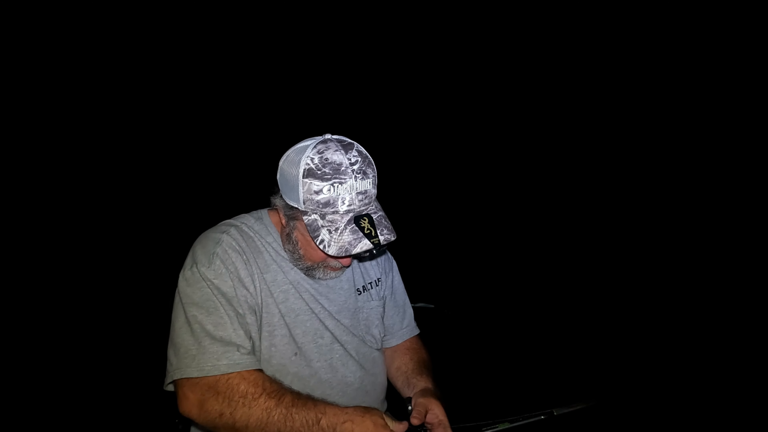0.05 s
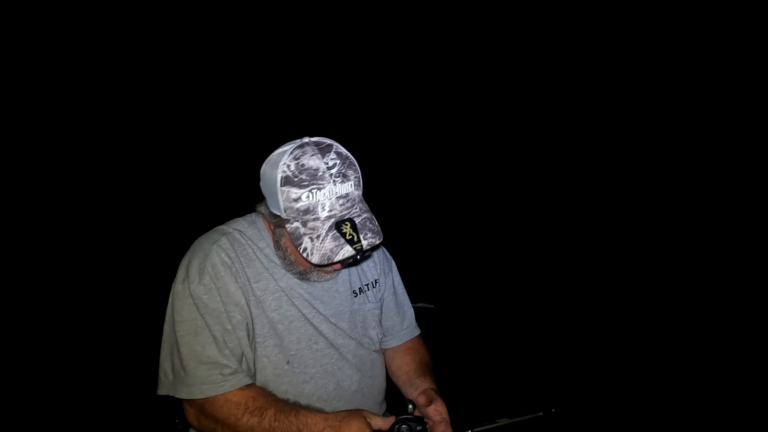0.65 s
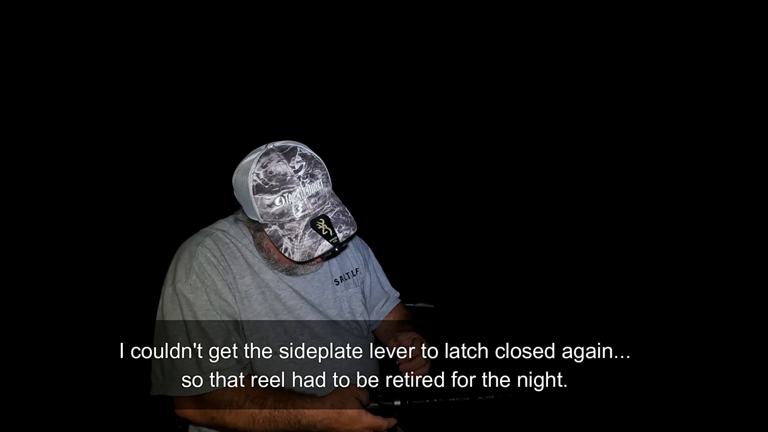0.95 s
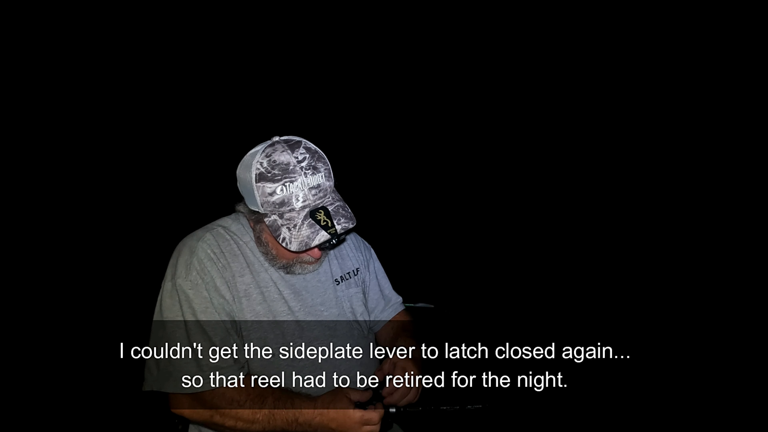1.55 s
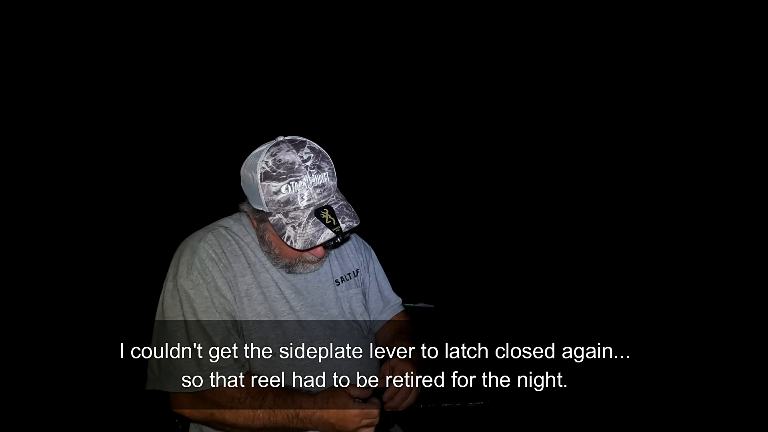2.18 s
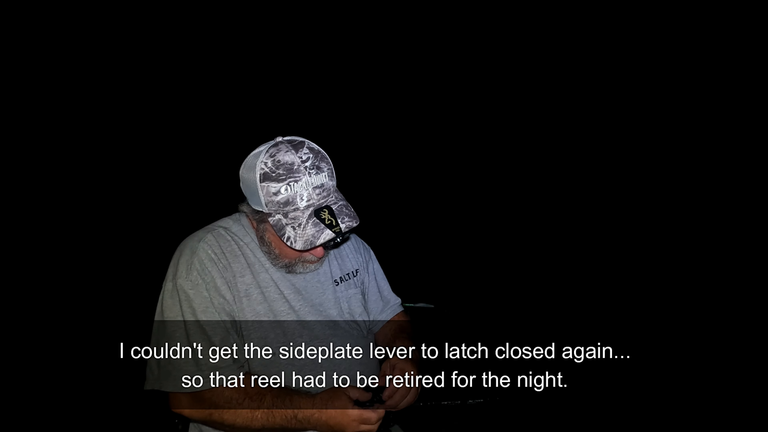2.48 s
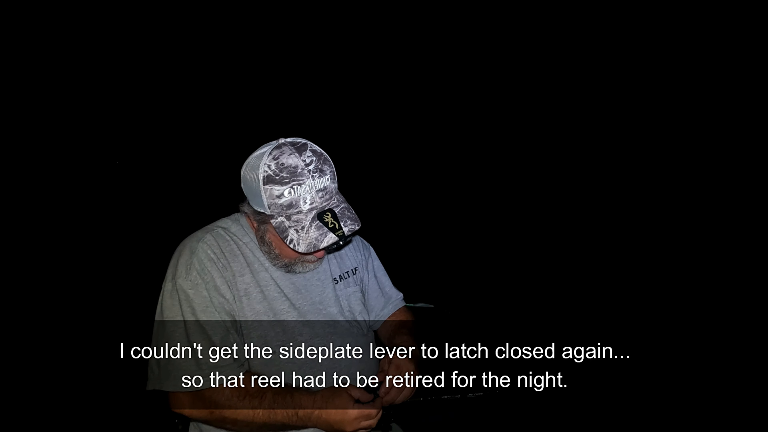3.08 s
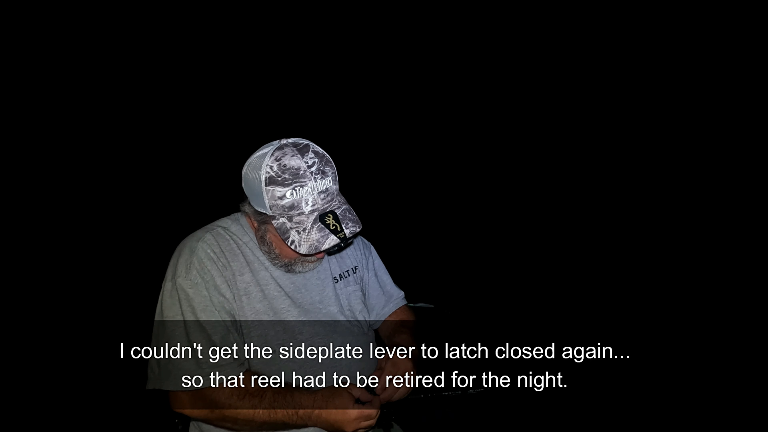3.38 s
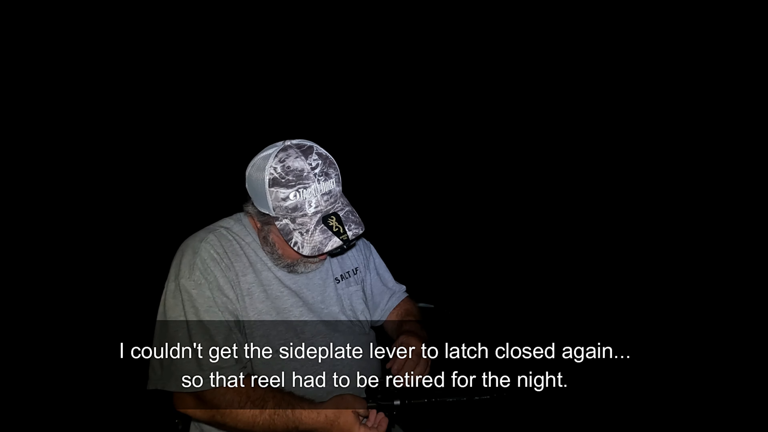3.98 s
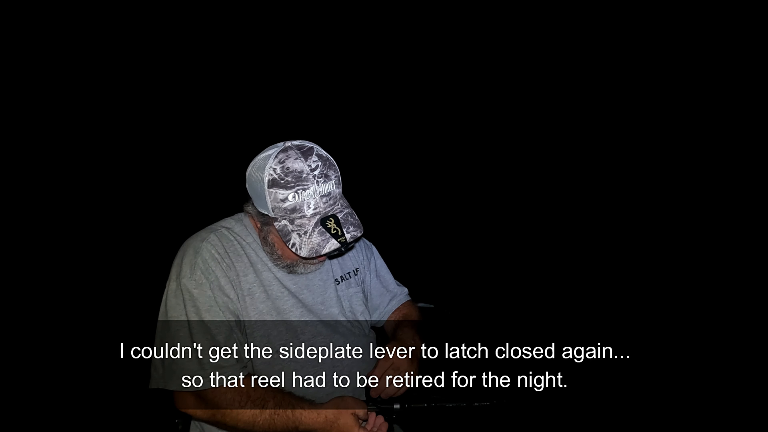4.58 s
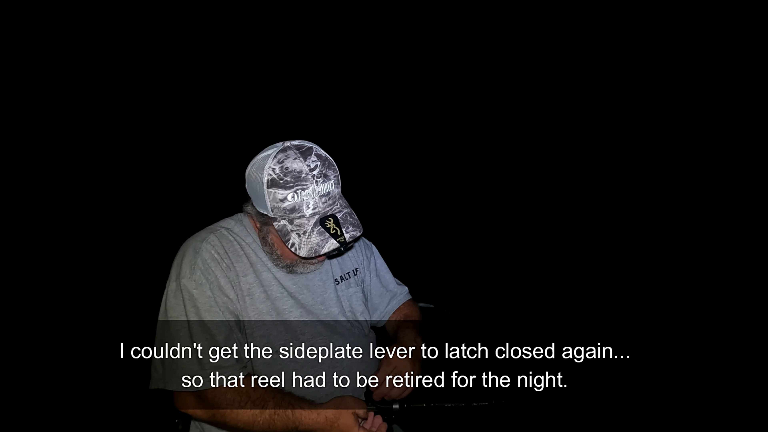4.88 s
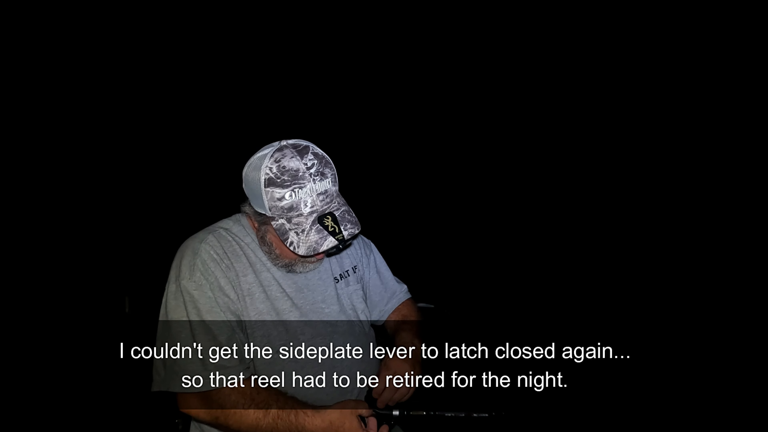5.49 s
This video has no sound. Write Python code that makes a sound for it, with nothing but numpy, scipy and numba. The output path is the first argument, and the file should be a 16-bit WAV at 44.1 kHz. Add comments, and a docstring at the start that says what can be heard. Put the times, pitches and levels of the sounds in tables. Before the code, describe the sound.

Crickets and buzzing insects sing steadily outdoors while a fishing reel's lever snaps loudly twice among light handling knocks.

```python
"""A night chorus of insects by a lake: a shrill wall of rasping wings, and crickets trilling at three
pitches, each wing stroke a short tone. Close by, a fishing reel is handled: soft knocks and rubs, and
two hard snaps of its lever that ring its modes. Bubbles plip in the water over a low, far rumble.
The snaps overload the camera, whose gain control ducks the chorus and lets it swell back."""
import sys
import numpy as np
from scipy import signal
from scipy.fft import rfft, irfft, next_fast_len
from scipy.io import wavfile
from scipy.ndimage import map_coordinates
from numba import njit

SR = 44100
rng = np.random.default_rng(int(sys.argv[2]) if len(sys.argv) > 2 else 0)


def generate_wav(sig):
    """Save sig (samples, or channels by samples) to the path in sys.argv[1] as 16-bit PCM at SR."""
    pcm = np.round(np.clip(np.atleast_2d(sig).T, -1, 1) * 32767).astype(np.int16)
    wavfile.write(sys.argv[1], SR, pcm)


N = 248724

# spectral shapes of the insects' rasp and of its overtone: frequency_hz, density_db
RASP_SPECTRUM = [(2000, -65), (3400, -33.5), (3920, -35), (4120, -34), (5020, -4.5), (5450, 1.5),
                 (5690, -1.5), (5970, -5), (6220, -19), (6450, -27.5), (7800, -45.5), (10100, -85),
                 (17200, -120)]
OVERTONE_SPECTRUM = [(4710, -39), (8000, -38), (8240, -58), (8650, -15), (10900, 4), (11300, 3),
                     (12400, -6.5), (13500, -8), (14200, -24), (16100, -30), (22000, -120)]
# crowds of crickets: pitch_hz, pitch_spread_ratio, strokes_per_s, rate_spread_ratio, level_db, lean_db
CRICKET_CROWDS = [(2413, 0.014, 67, .1, -31, 3), (2660, 0.02, 61, .1, -31, 1.5),
                  (3052.5, 0.017, 42, .15, -34, -3.5)]
# the nearest crickets: pitch_hz, strokes_per_s, level_db, lean_db
CRICKET_SOLOS = [(3030, 38.9, -38.5, -4), (2425, 67.3, -38.5, 3)]
# how keenly the crickets sing: time_s, gain_db
CRICKET_KEENNESS = [(0, .3), (.55, -1.5), (.82, 0.5), (1.5, 0.7), (1.88, -1.6), (2.1, -0.1), (3.6, -.2),
                    (4.3, 0.1), (5.4, -0.9)]
# nearer shrill insects: pitch_hz, width_hz, strokes_per_s, level_db, lean_db
NEAR_BUZZERS = [(5500, 220, 25, -36, 1), (5400, 400, 104, -37, -1)]
# snaps of the lever: start_s, level_db, slam_band_hz, seat_band_hz, seat_delay_s, jolt_db, jolt_band_hz
LEVER_SNAPS = [(2.1534, 14.5, 13000, 5800, 0.0022, 4.5, 520), (3.4314, 15, 8360, 6850, .0014, -6, 1050)]
# modes of the lever and of the whole reel jolted in the hand: frequency_hz, level_db, t60_s
LEVER_MODES = [(2410, 11.5, 0.0048), (3910, 0, 0.0093), (4580, 0.5, 0.0062), (5870, 2.5, 0.0037),
               (6685, -2.5, 0.0074), (7207, -1, 0.0049), (7940, -2.5, 0.0038), (9925, 2, 0.0046),
               (11350, 0, 0.0054), (11990, 0, 0.0069)]
JOLT_MODES = [(400, 1, 0.0044), (800, -4, .005), (1160, 0, 0.0044), (1560, 3, .007)]
# modes of the reel's body: frequency_hz, level_db
BODY_MODES = [(440, -10), (665, -5.5), (1000, -2), (1270, -11), (1530, -8), (1740, -8), (1980, -6)]
# hands knocking the reel, each level relative within its column:
# start_s, ring_db, band_hz, t60_s, clatter_db, click_db, tick_db
HAND_KNOCKS = [(0.476, -37, 1850, .03, -31, -54, -56), (0.6765, -20, 580, .04, -24, -56, -70),
               (0.731, -35, 915, .025, -29, -54, -54), (0.7645, -37, 1900, .02, -36, -44, -43),
               (2.084, -48, 1200, .02, -46, -48, -48), (2.11, -42, 700, .03, -39, -52, -45),
               (3.901, -29, 1650, .035, -29, -34, -45), (4.728, -28, 600, .05, -25, -37, -40),
               (4.7795, -24, 700, .045, -19, -42, -47), (4.8925, -35, 900, .03, -35, -35, -38),
               (4.9225, -29, 640, .05, -25, -39, -24), (4.935, -30, 900, .04, -36, -38, -50),
               (4.9525, -26, 1500, .05, -22, -38, -43), (4.959, -29, 600, .04, -36, -50, -60),
               (5.361, -31, 1900, .06, -32, -48, -55), (5.5575, -20.5, 1700, .03, -19, -26, -39),
               (5.5655, -28, 1000, .04, -33, -44, -56)]
# fingers rubbing the reel: middle_s, length_s, level_db, centre_hz
FINGER_RUBS = [(0.75, .09, -50, 1250), (4.79, .04, -48, 1000), (4.914, .03, -45, 6000),
               (4.953, .07, -45.5, 1050), (4.988, .03, -37.5, 1450), (5.37, .06, -47, 1600)]
# bubbles in the water: start_s, relative_level_db, pitch_hz
BUBBLES = [(0.9675, -29, 1265), (1.33, -32, 1245), (1.752, -29.5, 1000), (3.8177, -38, 1100)]
# spectral shape of the far rumble: frequency_hz, density_db
RUMBLE_SPECTRUM = [(15, -32), (25, 3.5), (108, -7), (140, -2.5), (175, 0), (234, -6.5), (429, -19),
                   (479, -19), (771, -25), (1030, -22), (1660, -26), (2000, -28), (2600, -44), (4400, -120)]
# soft bumps in the deepest rumble: middle_s, level_db
RUMBLE_BUMPS = [(0.08, -38), (0.45, -36), (2.92, -39), (4.76, -34), (5.41, -42)]
# swells of the far murmur: middle_s, length_s, rise_db
MURMUR_SWELLS = [(0.25, .12, 3), (1.28, .3, 3), (1.7, .1, 3), (2.0, .12, 3), (3.28, .3, 4), (3.8, .1, 4),
                 (4.25, .22, 4), (5.17, .12, 5)]
# likeness of left and right in rasp and rumble: frequency_hz, coherence_ratio
STEREO_COHERENCE = [(60, 0.8), (250, 0.66), (700, 0.25), (2000, 0.4), (5500, 0.69), (12000, 1)]
# their level on the left over that on the right: frequency_hz, lean_db
STEREO_LEAN = [(60, -2), (110, -2.5), (190, -4.5), (350, -5.5), (630, -6), (1140, -3), (2040, -1),
               (3680, 2), (6630, -0.5), (11900, 1.5)]


def shrill_insects(count=8, strokes_per_s=150, rate_spread=.35, depth=0.18, overtone_db=-28):
    """Incoherent summation: many rasps, each noise pulsed by wing strokes, fuse into a shimmering wall."""
    t, rasps = np.arange(N) / SR, np.zeros((2, N))
    for _ in range(count):
        cycles = strokes_per_s * np.exp(rate_spread * rng.normal()) * t + .5 * wobble(4.4)
        rasps += (1 + depth * np.cos(2 * np.pi * cycles)) * rng.standard_normal((2, N))
    wall = diffuse(rasps, RASP_SPECTRUM) + amp(overtone_db) * diffuse(rasps, OVERTONE_SPECTRUM)
    shimmer_db = 0.35 * wobble(11)
    return wall * amp(-23.5 + shimmer_db)


def trill(pitch_hz, strokes_per_s, stroke_s, sag, wet_db, jitter_s=.0005, uneven_db=2.0, t60_s=0.47):
    """Stridulation: each wing stroke of a cricket is a short tone whose pitch sags as the wing slows."""
    progress = np.linspace(0, 1, int(stroke_s * SR))
    glide_hz = pitch_hz * (1 - sag * (progress - .5))
    stroke = np.sin(np.pi * progress) * np.sin(2 * np.pi * np.cumsum(glide_hz) / SR)
    timing, force = rng.standard_normal((600, 2)).T
    starts_s = (np.arange(len(timing)) + rng.random()) / strokes_per_s + jitter_s * timing
    pulses = np.bincount(np.abs(starts_s * SR).astype(int), amp(uneven_db * force), N)[:N]
    # the trees scatter the call along different paths to each microphone port
    t = np.arange(SR // 5) / SR
    echoes = unit(rng.standard_normal((2, len(t))) * amp(-60 * t / t60_s))
    paths = amp(wet_db) * echoes / np.sqrt(len(t))
    paths[:, 0] += 1  # the direct path
    scattered = signal.fftconvolve(stroke[None], paths, axes=1)
    return unit(signal.oaconvolve(pulses[None], scattered, axes=1)[:, :N])


def crickets(count=9, solo_duty=0.72):
    """Superposition: trills a little apart in pitch and pace blur into crowds; two crickets sing nearer."""
    out = np.zeros((2, N))
    for hz, hz_spread, rate, rate_spread, db, lean_db in CRICKET_CROWDS:
        crowd = np.zeros((2, N))
        for detune in np.linspace(-hz_spread, hz_spread, count):
            own_rate = rate * np.exp(rate_spread * rng.normal())
            crowd += trill(hz * (1 + detune), own_rate, stroke_s=0.00943, sag=0.099, wet_db=-1.0)
        out += panned(unit(crowd), lean_db) * amp(db + 0.46 * wobble(5.9))
    for hz, rate, db, lean_db in CRICKET_SOLOS:
        solo = trill(hz, rate, stroke_s=solo_duty / rate, sag=.035, wet_db=-8, jitter_s=.0003)
        out += panned(solo, lean_db) * amp(db + 0.18 * wobble(4.6))
    keenness_db = np.interp(np.arange(N) / SR, *np.transpose(CRICKET_KEENNESS))
    return lagged(out * amp(keenness_db), lag_ms=0.035)


def buzzers():
    """Forced resonance: each stroke's scrape drives a narrow resonance of the wing."""
    t, out = np.arange(N) / SR, np.zeros((2, N))
    for hz, width_hz, rate, db, lean_db in NEAR_BUZZERS:
        strokes = np.sin(np.pi * (rate * t + .2 * wobble(3))) ** 2
        wing = resonate(strokes * rng.standard_normal(N), hz, width_hz)
        out += panned(amp(db) * unit(wing), lean_db)
    return out


def whistler(pitch_hz=5567, drift_hz=5, level_db=-39.5, flutter_db=2):
    """Random modulation: one insect's thin note drifts in pitch and flutters in level on each side."""
    phase = 2 * np.pi * np.cumsum(pitch_hz + drift_hz * wobble(12)) / SR
    flutter = amp(flutter_db * np.array([wobble(18), wobble(7.9)]))
    return amp(level_db) * unit(np.sin(phase) * flutter)


def lever_snaps(slam_s=.00055, rebound_s=.0034, light_band_hz=6270, crack_db=-15, crack_t60_s=.013):
    """Impact excitation: each contact of the lever cracks and rings it; the slam also jolts the reel."""
    ring, crack = np.zeros((2, N))
    t = np.arange(SR // 20) / SR
    for start_s, snap_db, slam_hz, seat_hz, seat_s, jolt_db, jolt_hz in LEVER_SNAPS:
        contacts = [(0, -15.5, light_band_hz),  # the catch trips
                    (slam_s, 0, slam_hz),  # the lever slams home,
                    (seat_s, -4, seat_hz),  # seats
                    (rebound_s, -5.5, light_band_hz)]  # and rebounds once
        for delay_s, contact_db, band_hz in contacts:
            at_s, db = start_s + delay_s, snap_db + contact_db
            add(ring, at_s, amp(db) * struck(LEVER_MODES, t, band_hz, octaves=0.4))
            add(crack, at_s, burst(t, db + crack_db, crack_t60_s))
        add(ring, start_s + slam_s, amp(jolt_db) * struck(JOLT_MODES, t, jolt_hz, octaves=1.1))
    sound = ring + resonate(crack, centre_hz=7500, width_hz=4300)
    return lagged(panned(sound, lean_db=1.2), lag_ms=0.005)


def reel_knocks(detune=0.029, click_t60_s=0.013):
    """Damped vibration: a touch clicks small parts and rings body modes that the grip shifts and damps."""
    ring, clatter, click, tick = np.zeros((4, N))
    t = np.arange(SR // 5) / SR
    for start_s, ring_db, band_hz, t60_s, clatter_db, click_db, tick_db in HAND_KNOCKS:
        modes = [(hz * (1 + detune * rng.normal()), db, t60_s) for hz, db in BODY_MODES]
        add(ring, start_s, amp(ring_db) * struck(modes, t, band_hz, octaves=0.44))
        add(clatter, start_s, burst(t, clatter_db + 2, t60_s))
        add(click, start_s, burst(t, click_db + 22, click_t60_s))
        add(tick, start_s, burst(t, tick_db + 20, click_t60_s))
    sound = ring + resonate(clatter, centre_hz=1670, width_hz=2100)
    sound += resonate(click, centre_hz=4500, width_hz=1750)
    sound += resonate(tick, centre_hz=6330, width_hz=850)
    return panned(sound, lean_db=-1.5)


def finger_rubs(slips_per_s=1500, width_ratio=0.75):
    """Stick-slip friction: fingers slide over the reel in a run of tiny slips that swells and fades."""
    out = np.zeros(N)
    for middle_s, length_s, db, hz in FINGER_RUBS:
        slips = rng.standard_normal(N) * (rng.random(N) < slips_per_s / SR)
        out += amp(db) * hump(middle_s, length_s) * unit(resonate(slips, hz, width_ratio * hz))
    return panned(out, lean_db=-6)


def water_plips(length_s=0.042, rise_per_s=1.2, rough_rad=0.35, gain_db=-8.0):
    """Bubble resonance: each bubble rings with a soft start and a slightly rising pitch."""
    out, t = np.zeros(N), np.arange(int(length_s * SR)) / SR
    envelope = np.sin(np.pi * (t / length_s) ** .6) ** 2
    for start_s, db, hz in BUBBLES:
        phase = 2 * np.pi * hz * t * (1 + rise_per_s * t / 2) + rough_rad * wobble(370)[:len(t)]
        add(out, start_s, amp(db + gain_db) * envelope * np.sin(phase))
    return panned(out, lean_db=4.5)


def far_rumble(deep_hz=85, swell_top_hz=296, bump_length_s=0.142):
    """Amplitude modulation of a far murmur: its middle band swells, its deepest heaves and bumps."""
    murmur = diffuse(rng.standard_normal((2, N)), RUMBLE_SPECTRUM)
    deep = filtered(murmur, lambda hz: 1 / (1 + (hz / deep_hz) ** 4))
    upper = filtered(murmur, lambda hz: 1 - 1 / (1 + (hz / swell_top_hz) ** 4))
    middle = murmur - deep - upper
    heave = amp(-42.5 + 1.5 * wobble(8.8))
    bumps = sum(amp(db) * hump(middle_s, bump_length_s) for middle_s, db in RUMBLE_BUMPS)
    swell = amp(sum(db * hump(middle_s, length_s) for middle_s, length_s, db in MURMUR_SWELLS))
    waver = amp(-36 + 1.32 * wobble(6.3))
    return (middle * swell + upper) * waver + unit(deep) * (heave + bumps)


def struck(modes, t, band_hz, octaves):
    """Modal synthesis: a contact rings mostly the modes near its own band."""
    reach = lambda hz: 1 / (1 + (np.log2(hz / band_hz) / octaves) ** 2)
    return sum((-1) ** k * reach(hz) * amp(db - 60 * t / t60_s) * np.sin(2 * np.pi * hz * t)
               for k, (hz, db, t60_s) in enumerate(modes))


def burst(t, level_db, t60_s):
    """Exponential decay of white noise."""
    return amp(level_db - 60 * t / t60_s) * rng.standard_normal(len(t))


def resonate(x, centre_hz, width_hz):
    """Second-order resonance, applied twice for steep skirts."""
    return filtered(x, lambda f: (1j * f * width_hz / (centre_hz ** 2 - f * f + 1j * f * width_hz)) ** 2)


def diffuse(pair, spectrum):
    """Partial coherence: two unrelated signals mix into one coloured, wide stereo sound of rms 1."""
    def mid_side_gains(hz):
        angle = np.arccos(np.clip(along(STEREO_COHERENCE, hz), -1, 1)) / 2
        return amp(along(spectrum, hz)) * [np.cos(angle), np.sin(angle)]
    mid, side = filtered(pair, mid_side_gains)
    stereo = np.array([mid + side, mid - side])
    return unit(filtered(stereo, lambda hz: panned(1, along(STEREO_LEAN, hz))))


def panned(x, lean_db):
    """Level difference: left is louder than right by lean_db."""
    return x * amp(np.array([[.5], [-.5]]) * lean_db)


def lagged(pair, lag_ms):
    """Arrival-time difference: sound reaches the left port lag_ms after the right."""
    return filtered(pair, lambda hz: np.exp(np.array([[-1j], [1j]]) * np.pi * hz * lag_ms / 1000))


def filtered(x, response):
    """Linear filtering: the spectrum of x times a complex frequency response."""
    size = next_fast_len(N + SR // 2)
    return irfft(rfft(x, size) * response(np.fft.rfftfreq(size, 1 / SR)), size)[..., :N]


def hump(middle_s, length_s):
    """Gaussian envelope, length_s wide at 1/e of its peak."""
    return np.exp(-(2 * (np.arange(N) / SR - middle_s) / length_s) ** 2)


def wobble(knots_per_s):
    """Smooth random fluctuation."""
    knots = rng.standard_normal(int(N * knots_per_s / SR) + 4)
    return map_coordinates(knots, [np.arange(N) * knots_per_s / SR])


def along(points, hz):
    """Interpolation on a logarithmic frequency axis."""
    points_hz, values = np.transpose(points)
    return np.interp(np.log(hz + 1), np.log(points_hz + 1), values)


def add(track, start_s, sound):
    """Superposition of a sound on a track."""
    part = track[round(start_s * SR):][:len(sound)]
    part += sound[:len(part)]


def amp(db):
    """Decibels to amplitude ratio."""
    return 10 ** (np.asarray(db) / 20)


def unit(x):
    """Normalisation to rms 1."""
    return x / np.sqrt(np.mean(x ** 2) + 1e-20)


def scene():
    """Superposition of the chorus, the far rumble and the small sounds nearby."""
    chorus = crickets() + shrill_insects() + buzzers() + whistler()
    return chorus + far_rumble() + lever_snaps() + reel_knocks() + finger_rubs() + water_plips()


@njit
def gain_control(peak, limit, gain, attack_s, release_s):
    """Negative feedback: gain falls fast while the output is over the limit, then creeps back toward 1."""
    gains = np.empty(len(peak))
    for i in range(len(peak)):
        if peak[i] * gain > limit:
            gain += (limit / peak[i] - gain) / (attack_s * SR)
        else:
            gain += (1 - gain) / (release_s * SR)
        gains[i] = gain
    return gains


def record(dry, limit_db=-4, start_db=-7.0, top_hz=15200):
    """Compression, its gain still recovering at first; then clipping and the camera's band limit."""
    peak = np.abs(dry).max(axis=0)
    gain = gain_control(peak, float(amp(limit_db)), float(amp(start_db)), attack_s=0.00046, release_s=0.62)
    clipped = np.clip(dry * gain, -1, 1)
    return filtered(clipped, lambda hz: 1 / (1 + (hz / top_hz) ** 60))


dry = scene()
out = record(dry)
generate_wav(out)
```